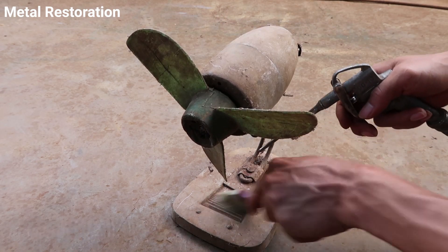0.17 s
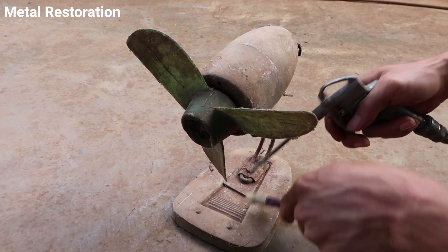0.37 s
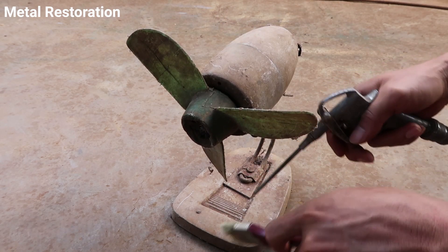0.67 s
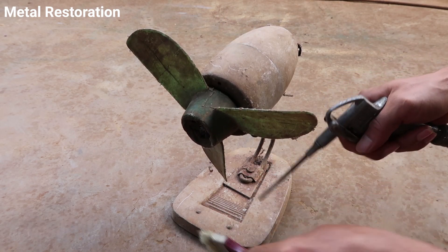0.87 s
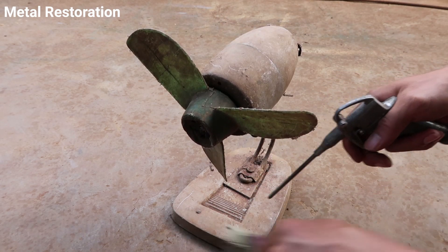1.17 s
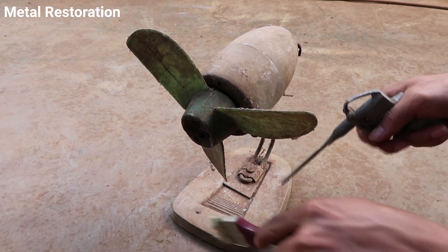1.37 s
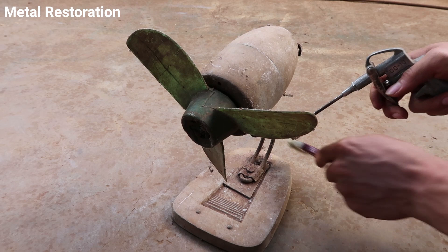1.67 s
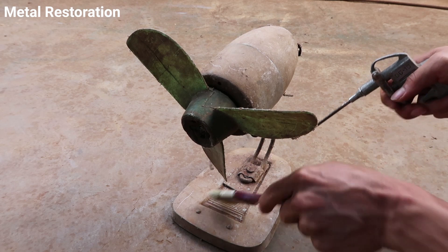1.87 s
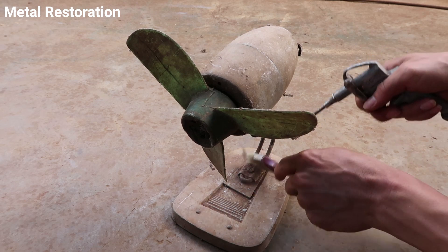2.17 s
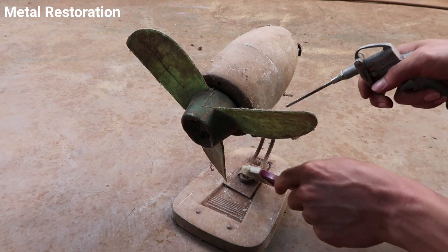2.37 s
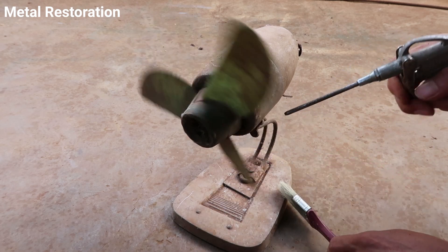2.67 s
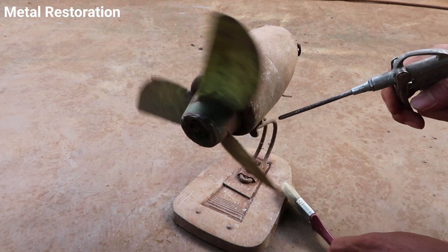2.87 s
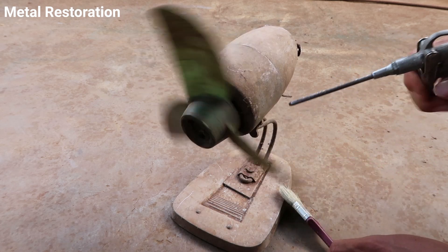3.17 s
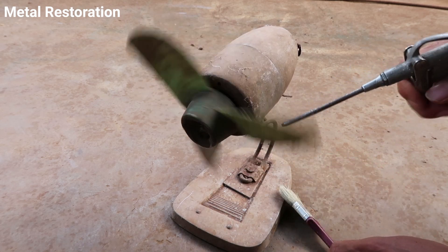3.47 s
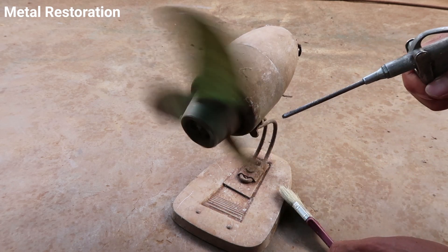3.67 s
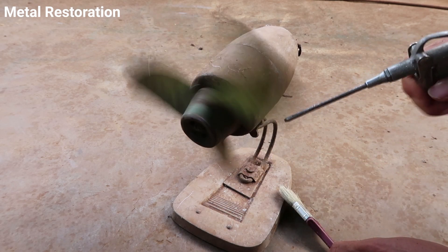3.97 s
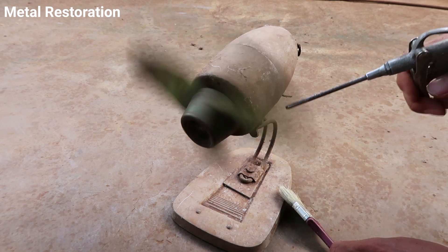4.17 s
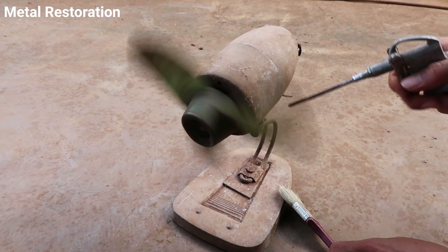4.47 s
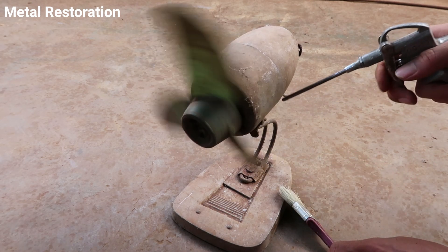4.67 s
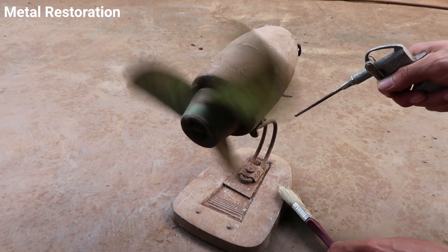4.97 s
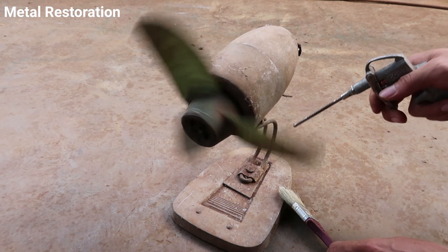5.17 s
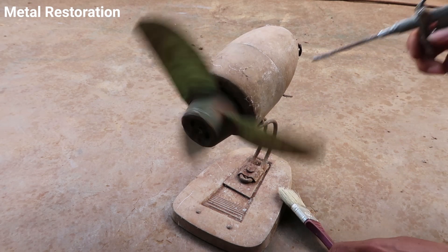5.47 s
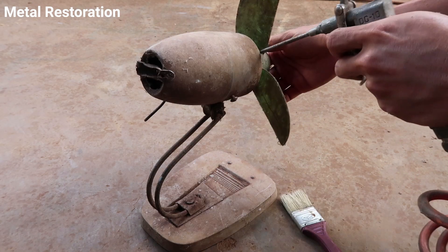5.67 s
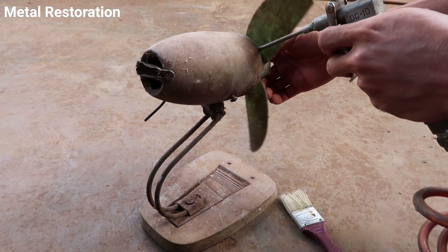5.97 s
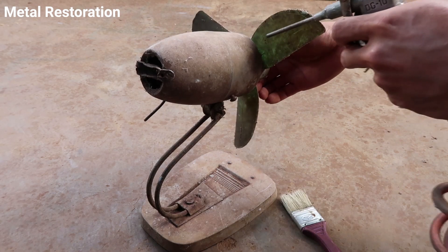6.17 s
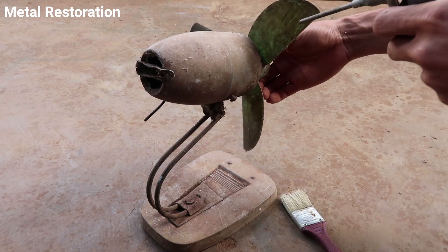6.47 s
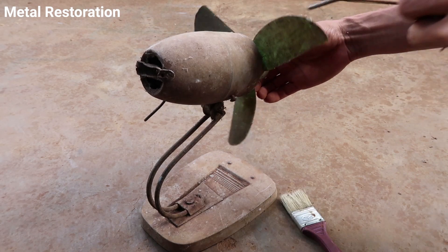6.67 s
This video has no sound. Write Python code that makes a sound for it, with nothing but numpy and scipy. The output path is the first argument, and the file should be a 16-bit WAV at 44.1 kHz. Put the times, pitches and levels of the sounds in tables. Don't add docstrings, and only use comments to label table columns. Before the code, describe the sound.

Close up in a workshop, a brush scrapes briefly and strikes a metal fan's base once, hard. Fifteen separate puffs of compressed air follow, roughly two per second, loud and hissy with a hollow, airy ring that shifts as the jet moves over base, motor shell and blades. The final blast is longer. Quiet far engine drone and rumble fill the gaps; the last three bursts follow an abrupt scene change.

```python
import sys
import numpy as np
from scipy import signal
from scipy.fft import rfft, irfft, next_fast_len
from scipy.io import wavfile
from scipy.ndimage import uniform_filter1d

SR = 44100
rng = np.random.default_rng(int(sys.argv[2]) if len(sys.argv) > 2 else 0)


def ratio_of_db(decibels):
    return 10 ** (np.asarray(decibels, float) / 20)


def wav_record(signal):
    frames = np.transpose(np.atleast_2d(signal))
    bounded = np.clip(frames, -1, 1)
    quanta = np.round(bounded * 32767).astype(np.int16)
    wavfile.write(sys.argv[1], SR, quanta)


N = 300762
T = np.arange(N) / SR
BIN_HZ = np.fft.rfftfreq(512, 1 / SR)
FRAME_S = np.arange(N // 128 + 6) * 128 / SR
SCENE_CHANGE_S = 5.677
CHANGED = T > SCENE_CHANGE_S

# pitch in Hz, correlation from 0 to 1.
PORT_LIKENESS = [(60, 1), (200, .994), (380, .96), (950, .993), (2400, .935), (6000, .865), (9000, .77),
                 (15000, .64)]
# pitch in Hz, left minus right in dB.
PORT_LEAN = [(60, 0), (200, -.3), (380, -.5), (700, -4), (1200, -4), (2380, -2), (5980, -0.6),
             (15000, -0.1)]
# pitch in Hz, left lead in radians.
PORT_LEAD = [(0, 0), (80, -0.1), (160, -.4), (400, -0.16), (2500, 0.02), (6000, -0.28), (9000, -1.04),
             (12500, -1.2), (16000, -0.9)]
# pitch in Hz, t60 in seconds, level in dB.
ROOM_DECAY = [(200, 0.63, -2.5), (700, 0.4, 2.5), (1400, 0.37, 3), (2500, 0.37, 4.5), (4600, 0.41, -1.5),
              (9970, 0.34, 0.5), (16000, 0.36, -1.5)]

# pitch in Hz, density in dB per Hz.
WASH_SPECTRUM = [(30, -30.5), (200, -10.5), (260, -18.5), (500, -13), (800, -20.5), (2500, -17.5),
                 (6000, -29), (10000, -37), (15000, -60)]
# time in seconds, level in dB.
RUMBLE_LEVEL = [(0, -47), (1.04, -53), (1.29, -73), (1.45, -61), (1.7, -53), (1.98, -51), (2.49, -56),
                (3.21, -49.5), (3.75, -69), (4.08, -53), (5.6, -56), (5.72, -56.5), (6.55, -66),
                (6.82, -51)]
# pitch in Hz, width in Hz, level in dB.
RUMBLE_MODES = [(60, 56, -2.5), (87, 73, 13), (183, 40, 5)]
# time in seconds, firing rate in Hz, level in dB.
ENGINE_COURSE = [(0, 28.73, -53.5), (1.1, 29.1, -56.5), (1.45, 29.35, -47.5), (2, 29.24, -51.5),
                 (2.5, 30.13, -57.5), (3.599, 28.34, -51), (4, 28.04, -65), (4.5, 27.6, -49),
                 (5.6, 26.87, -56), (5.7, 26.8, -86)]
# multiple of the firing rate, level in dB.
ENGINE_ORDERS = [(2, -8), (3, -2), (4, -12), (5, 0), (6, -9), (7, -10)]
# time in seconds, change in dB.
THIRD_ORDER_THROB = [(0, -3.5), (1.1, -8), (1.55, -9.5), (1.8, 5), (2.4, 0.5), (3.2, 3.5), (4, 7),
                     (4.6, 2.5), (5.6, 3.5)]
# time in seconds, pitch in Hz, level in dB.
MOTOR_COURSE = [(0, 176, -55), (0.451, 166, -48.5), (.8, 180, -57.5), (1.101, 180, -70), (1.6, 182, -65),
                (1.75, 180, -54), (2.0, 176, -55), (2.3, 163, -78), (2.9, 165, -58), (3.1, 182, -58),
                (3.4, 186, -63), (4.2, 150, -83), (4.5, 165, -62.5), (4.9, 185, -63.5), (5.3, 170, -75.5),
                (5.85, 153, -68.5), (6.4, 173, -58.5), (6.75, 184, -72)]

# start in seconds, length in seconds, level in dB.
BRUSH_STROKES = [
    (-.02, 0.14, -43),
    (0.093, 0.18, -49),
    (0.233, 0.036, -43.5),
    (0.267, 0.085, -39.5),
    (0.307, 0.39, -51),
    (1.186, 0.2, -57),
    (1.412, 0.14, -57),
    (1.783, .1, -61),
    (1.877, 0.12, -50.5),
]
# pitch in Hz, density in dB per Hz.
BRISTLE_SPECTRUM = [(180, -43), (300, -3), (801, -5), (898, -6), (2070, -7.5), (2400, -7), (2920, -8.5),
                    (4690, -16), (10000, -23), (15000, -37.5)]
# time in seconds, peak in dB, tick in dB, damping factor,
# brightness in dB per octave.
KNOCK_EVENTS = [(.03, -45.5, -46, 0.71, -0.5), (.07, -44, -46, 1, -1.5), (.242, -33.5, -42, 2.7, 3),
                (.275, -48.5, -57, 1.1, -1.5), (0.303, -7.5, -22.5, 1.51, -2),
                (.397, -40.5, -60, 0.9, -0.5), (.428, -34, -54, 1.1, -2), (1.24, -50.5, -60, 0.38, -7),
                (2.925, -61, -23, 2.6, 5), (3.948, -66, -75, 1, -1), (5.4797, -60, -5.5, 2.6, 5)]
# pitch in Hz, level in dB, t60 in seconds.
KNOCK_MODES = [(425, -26.5, .5), (744, -25, .45), (796, -6.5, .18), (1010, -14, .06), (758, -13, .2),
               (1141, -24, .22), (782, -2, .045), (1389, -24, .28), (1442, -17, .22), (1770, -16, .07),
               (1810, -20, .25), (2130, -18, .17), (2860, -17, .07), (3420, -19, .06)]

# valve opens in seconds, valve shuts in seconds, jet level in dB,
# pressure sag in dB, opening thump in dB.
BURSTS = [(0.5213, 0.671, -21.5, 2, -21), (.876, 1.028, -17.5, -4.5, -28.5),
          (1.4869, 1.64, -23.5, 1.5, -30), (1.97, 2.104, -20.5, -1.5, -34.5),
          (2.261, 2.403, -21.5, -5, -35.5), (2.6218, 2.788, -21.5, -5.5, -36), (3.095, 3.296, -20, -3, -34),
          (3.586, 3.866, -22, -4, -35.5), (4.086, 4.288, -20.5, -8, -49), (4.583, 4.758, -21, -4, -38.5),
          (4.998, 5.167, -23.5, 0, -32.5), (5.344, 5.495, -18.5, -6.5, -36),
          (5.788, 5.952, -21.5, -5, -40.5), (6.111, 6.26, -24, -3.5, -48), (6.477, 6.829, -23, 2, -47)]
# base resonance in dB, shell resonance in dB, blade resonance in dB,
# edge pitch at opening in Hz, edge pitch at shutting in Hz.
BURST_AIM = [(-10.5, -16.5, -15.5, 6070, 5240), (-10, -13, -3.5, 4460, 3300), (-19, -11.5, -19, 5940, 6000),
             (-13, -3.5, -7.5, 4100, 4300), (-13.5, -11, -12, 6300, 3750), (-14, -7.5, -11.5, 5960, 3400),
             (-8.5, 1.5, -6.5, 4800, 5600), (-14, -1, -1, 5600, 5640), (-12, 1.5, -9.5, 5100, 6050),
             (-40, -18, -4, 5840, 6200), (-11.5, -14, -12.5, 6940, 6250), (-12, -8.5, -26, 3800, 6160),
             (-2, 7, 3.5, 3100, 5550), (-7.5, 0, 2, 3300, 6600), (-3.5, 1.5, -2, 4930, 3800)]
# time in seconds, half length in seconds,
# jet change in dB, base change in dB, shell change in dB.
CROSSINGS = [(0.58, 0.029, 0, 5.5, 7.5), (0.67, 0.0071, -4, 3, 18), (1.01, .03, 0.5, 9, 10.5),
             (1.516, 0.022, -0.5, 11.5, -9.5), (1.556, 0.03, -1, -9, -16), (1.614, 0.028, -1, 13.5, 7.5),
             (1.976, 0.024, 2.5, 11, 1.5), (2.096, 0.015, -2, 5, 3), (2.382, 0.036, -1, 12.5, 12),
             (3.132, 0.017, -1.5, 6.5, 1.5), (3.276, 0.053, -0.5, 7.5, 1.5), (3.667, 0.015, 0, 12, 5.5),
             (3.733, 0.011, -3.5, -11, 4), (3.852, 0.049, 2.5, 12.5, 9), (4.25, 0.051, 1.5, 11, 1.5),
             (5.09, 0.036, -1.5, 12, 13.5), (5.458, 0.019, -8, 18, 10), (5.478, 0.012, 1, 8.5, -10.5),
             (6.175, 0.051, 1.5, 7.5, 8.5), (6.573, 0.037, -2, 1.5, 2), (6.714, 0.027, -0.5, 1.5, 4.5),
             (6.79, 0.031, -2, 0, -6.5)]
# time in seconds, half length in seconds,
# jet change in dB, blade change in dB, brightness change in dB.
SLIPS = [(.654, 0.036, 0, 5, 0.5), (.9, 0.0069, 0.5, 4, -2.5), (.99, 0.025, -2, 8, 3.5),
         (1.563, 0.015, 0, 14, 4), (2.348, .03, 2.5, 3, -4.5), (2.63, 0.01, 4, 5.5, 0.5),
         (3.185, .025, -0.5, 11.5, 0), (3.28, 0.028, 0.5, -18, 1.5), (3.625, 0.018, 3.5, -16, 1),
         (3.697, 0.011, 5, -10, -7), (3.78, 0.016, 4, -25, -2.5), (4.176, 0.042, -2.5, 13.5, 0.5),
         (4.586, 0.022, -3, 3.5, 0.5), (4.75, 0.021, -5, -8, 0), (5.042, 0.032, -2, 2, 4),
         (5.126, 0.017, 2, 5, -0.5), (5.42, .03, 0.5, -2, -3), (5.81, 0.018, 1, -1, 4),
         (6.257, 0.026, 3.5, -6, -2.5), (6.576, 0.071, -0.5, -10, 4), (6.72, 0.027, -1.5, 6, 4.5),
         (6.795, 0.023, 1, -14, 6), (6.825, .018, -9, -0.5, -3.5)]
# time in seconds, half length in seconds, pitch in Hz, lift in dB.
RIMS = [(0.51, .05, 1800, 3.5), (0.88, .09, 1200, 4), (2.041, 0.069, 5800, 5.5), (2.095, 0.03, 4250, 8),
        (3.861, .025, 3660, 11.5), (4.68, 0.086, 1800, 7), (5.4, 0.078, 4400, 5.5), (5.2, .06, 3300, 10.5),
        (6.22, .05, 5500, 0.5), (6.582, 0.061, 2300, 2.5), (6.79, .015, 7400, 7), (.96, 0.053, 2350, 0.5),
        (0.75, .04, 1700, 9), (3.73, .04, 2900, -1), (3.645, .03, 1800, -2.5), (0.53, .1, 12000, -3.5),
        (.56, 0.06, 3000, -2.5), (1.5, 0.031, 7300, 7), (1.565, 0.056, 3000, -3), (2.278, 0.047, 5500, 4.5),
        (2.3, .05, 2900, 1.5), (2.64, .03, 3200, 3), (4.1, .03, 2400, 1), (4.63, 0.036, 4500, 1),
        (4.644, .04, 2900, 8.5), (4.68, .05, 4100, 4), (4.71, .05, 3000, 3.5), (4.66, .06, 3200, -6.5),
        (5.36, .025, 3100, 1), (5.37, .03, 7000, 1), (5.026, .04, 7200, 0.5), (1.4, .06, 3600, 8),
        (2.3, .06, 960, 9), (5.14, .04, 6600, 0), (5.05, 0.049, 1700, -10), (5.369, .03, 1150, 4.5),
        (5.41, 0.03, 1250, 6.5), (4.3, .02, 890, 7), (5.1, .018, 660, 11), (5.8, .025, 1520, 5.5),
        (0.82, .03, 1550, 8), (5.1, .04, 1150, 4.5), (5.478, 0.0072, 7100, 6), (6.14, 0.072, 3530, 8.5),
        (6.19, 0.075, 6800, 5.5), (6.12, 0.034, 5300, 5.5), (6.59, 0.11, 8500, 2.5),
        (5.84, 0.061, 8300, 0.5)]
# pitch in Hz, density in dB per Hz.
JET_SPECTRUM = [(40, -45.5), (100, -14.5), (218, -17), (556, -8.5), (870, -11), (1700, -5.5), (3080, -1),
                (5540, -2.5), (9060, -2), (12500, -10), (14800, -17), (15400, -12), (16000, -29)]
# pitch in Hz, width in Hz, level in dB.
BASE_MODES = [(762, 230, 6.5), (886, 270, 4.5), (596, 630, 0)]
# pitch in Hz, width in Hz, level in dB.
SHELL_MODES = [(1328, 223, 2), (1415, 213, -0.5), (1576, 410, -8)]
# pitch in Hz, width in Hz, level in dB.
BLADE_MODES = [(2375, 400, 3), (2840, 380, -1), (3530, 910, 1.5)]
# pitch in Hz, width in Hz, level in dB.
BLADE_BACK_MODES = [(2450, 130, -6.5), (2970, 920, 4.5), (3480, 700, 1.5)]
# pitch in Hz, width in Hz, level in dB.
PLATE_MODES = [(762, 20, 0), (795, 24, -3)]


def evened(x):
    return x / np.sqrt(np.mean(x ** 2) + 1e-20)


def read(points, hz):
    point_hz, value = np.transpose(points)
    return np.interp(np.log(hz + 1), np.log(point_hz + 1), value)


def curve(points, column=1):
    columns = np.transpose(points)
    return np.interp(T, columns[0], columns[column])


def noise(field_db):
    a, b, c, d = rng.standard_normal((len(FRAME_S), len(BIN_HZ), 4)).T
    same = np.clip(read(PORT_LIKENESS, BIN_HZ), -1, 1)[:, None]
    left = a + 1j * b
    right = same * left + np.sqrt(1 - same ** 2) * (c + 1j * d)
    right = right * np.exp(-1j * read(PORT_LEAD, BIN_HZ))[:, None]
    lean = ratio_of_db(read(PORT_LEAN, BIN_HZ) / 2)[:, None]
    z = np.array([left * lean, right / lean]) * ratio_of_db(field_db)
    return signal.istft(z, nperseg=512, noverlap=384)[1][:, :N]


def patches(bins, frames):
    field = rng.standard_normal((len(FRAME_S), len(BIN_HZ))).T
    return evened(uniform_filter1d(uniform_filter1d(field, bins, 0), frames, 1))


def resonate(x, modes):
    out = 0
    for hz, width_hz, db in modes:
        b, a = signal.iirpeak(hz, hz / width_hz, SR)
        out = out + ratio_of_db(db) * evened(signal.lfilter(b, a, signal.lfilter(b, a, x)))
    return evened(out)


def slow_drift():
    return evened(uniform_filter1d(uniform_filter1d(rng.standard_normal(N), size=5000), size=5000))


def unsteady_turns(rate_hz):
    return np.cumsum(rate_hz * (1 + 0.0067 * slow_drift())) / SR


def engines():
    turns = unsteady_turns(curve(ENGINE_COURSE))
    orders = 0
    for k, db in ENGINE_ORDERS:
        order_db = db + (k == 3) * curve(THIRD_ORDER_THROB) + 2.5 * slow_drift()
        orders = orders + ratio_of_db(order_db) * np.sin(2 * np.pi * (k * turns + rng.random()))
    engine = ratio_of_db(curve(ENGINE_COURSE, 2)) * evened(orders)
    motor_turns = unsteady_turns(curve(MOTOR_COURSE))
    motor_db = curve(MOTOR_COURSE, 2) + 6 + 2.5 * slow_drift()
    return engine + ratio_of_db(motor_db) * np.sin(2 * np.pi * motor_turns)


def background():
    rumble = resonate(rng.standard_normal(N), RUMBLE_MODES) * ratio_of_db(curve(RUMBLE_LEVEL) - 2.0)
    wash = evened(noise(read(WASH_SPECTRUM, BIN_HZ)[:, None] + 2.7 * patches(bins=5, frames=20)))
    wash_db = -58.5 - 5.3 * CHANGED
    return rumble + engines() + ratio_of_db(wash_db) * wash


def tail():
    taps = np.zeros((2, SR // 2))
    at = np.arange(260, SR // 2 - 16, 16)
    at = at + rng.integers(0, 16, (2, len(at)))
    np.put_along_axis(taps, at, rng.choice([-1., 1.], at.shape), 1)
    hz, t, z = signal.stft(taps, SR, nperseg=256)
    same = np.clip(read(PORT_LIKENESS, hz) - .1 * np.clip(hz / 300, 0, 1), 0, 1)[:, None]
    z[1] = same * z[0] + np.sqrt(1 - same ** 2) * z[1]
    z[1] *= np.exp(-1j * read(PORT_LEAD, hz))[:, None]
    decay = np.array(ROOM_DECAY)
    t60_s = read(decay[:, [0, 1]], hz)[:, None]
    colour_db = read(decay[:, [0, 2]], hz)[:, None]
    out = signal.istft(z * ratio_of_db(colour_db - 60 * t / t60_s), SR, nperseg=256)[1]
    return out / np.linalg.norm(out[0])


def room(x, paths=9):
    cut, size = round(SCENE_CHANGE_S * SR), next_fast_len(N + 2 * SR)
    spaced = np.insert(x, cut, np.zeros(SR))
    turn = np.arange(len(spaced)) * 50 / SR
    wet = 0
    for k in range(paths):
        share = np.cos(np.pi / 2 * np.clip((turn - k + 1) % paths - 1, -1, 1))
        wet = wet + rfft(spaced * share, size) * rfft(tail(), size)
    out = np.delete(irfft(wet, size), np.s_[cut:cut + SR], axis=1)[:, :N]
    return out * np.clip(abs(SCENE_CHANGE_S - T) / 0.006, 0, 1)


def brush():
    level = 0
    for start_s, length_s, db in BRUSH_STROKES:
        level = level + ratio_of_db(db) * np.sin(np.pi * np.clip((T - start_s) / length_s, 0, 1)) ** .7
    scratch_db = 3 * patches(bins=5, frames=9) + 1.0 * patches(bins=150, frames=3)
    return level * evened(noise(read(BRISTLE_SPECTRUM, BIN_HZ)[:, None] + scratch_db))


def knocks():
    out, t = np.zeros(N), np.arange(12000) / SR
    spreads_db = rng.uniform(0.021, 3.2, (len(KNOCK_EVENTS), len(KNOCK_MODES)))
    for (s, db, tick_db, damping, tilt_db_oct), spread_db in zip(KNOCK_EVENTS, spreads_db):
        ring = 0
        for k, (hz, mode_db, t60_s) in enumerate(KNOCK_MODES):
            fall_db = mode_db + spread_db[k] + tilt_db_oct * np.log2(hz / 800) - 60 * t * damping / t60_s
            ring = ring + (-1) ** k * ratio_of_db(fall_db) * np.sin(2 * np.pi * hz * t)
        tick = resonate(rng.standard_normal(len(t)), [(6170, 3000, 0)]) * np.exp(-t / 0.00068)
        crack = resonate(rng.standard_normal(len(t)), [(1200, 650, 0)]) * np.exp(-t / 0.0051)
        body = 1.43 * ratio_of_db(db) * (ring + 0.48 * crack) * (1 - np.exp(-t / 0.0021))
        part = out[round(s * SR):][:len(t)]
        part += (body + ratio_of_db(tick_db) * tick)[:len(part)]
    return out * ratio_of_db(np.array([[-1.8], [1.8]]))


def valve():
    width_s, swing_hz, swing_s, lead_s = 0.00087, 110, 0.014, .0112
    out, t = np.zeros(N), np.arange(-400, 2600) / SR
    dip = -np.exp(-.5 * (t / width_s) ** 2)
    swing = 0.041 * np.sin(2 * np.pi * swing_hz * t) * np.exp(-abs(t) / swing_s) * (t > 0)
    for open_s, *_, thump_db in BURSTS:
        out[round((open_s - lead_s) * SR)] = ratio_of_db(thump_db + 11.0)
    b, a = signal.butter(1, 110, "high", fs=SR)
    return signal.lfilter(b, a, signal.oaconvolve(out, dip + swing)[:N])


def passing(rows):
    coarse = sum(np.outer(row[2:], np.exp(-((FRAME_S - row[0]) / row[1]) ** 2)) for row in rows)
    return np.array([np.interp(T, FRAME_S, column) for column in coarse])


def trigger():
    open_db_s, shut_db_s = 5001.5, 1302.5
    full_hose_db = -30.5
    surge_share, surge_s, soft_share, soft_s = 0.95, 0.013, 0.16, 0.018
    build_db, build_s = 0.5, 0.032
    open_s, shut_s, level_db, sag_db, thump_db = np.transpose(BURSTS)
    which = np.clip(np.searchsorted(open_s - .03, T) - 1, 0, None)
    since_s = T - open_s[which]
    held = np.clip(since_s / (shut_s - open_s)[which], 0, 1)
    excess_db = (thump_db - full_hose_db)[which]
    surge_db = surge_share * np.maximum(excess_db, 0) * np.exp(-abs(since_s) / surge_s)
    soft_db = soft_share * np.minimum(excess_db, 0) * np.exp(-abs(since_s) / soft_s)
    gate_db = open_db_s * np.minimum(since_s, 0) - shut_db_s * np.maximum(T - shut_s[which], 0)
    jet_db = level_db[which] + sag_db[which] * held + surge_db + soft_db + np.maximum(gate_db, -120)
    base_db, shell_db, blade_db, from_hz, to_hz = np.transpose(BURST_AIM)[:, which]
    speak_db = build_db * np.exp(-abs(since_s) / build_s)
    cross_jet_db, cross_base_db, cross_shell_db = passing(CROSSINGS)
    slip_db, touch_db, bright_db = passing(SLIPS)
    jet_db = jet_db + cross_jet_db + slip_db
    base_db = base_db + speak_db + cross_base_db
    shell_db = shell_db + speak_db + cross_shell_db
    edge_hz = from_hz + (to_hz - from_hz) * held
    return jet_db, base_db, shell_db, blade_db + touch_db, edge_hz, bright_db


def hiss_field(edge_hz, bright_db):
    edge_hz = np.interp(FRAME_S, T, edge_hz)
    near_oct = np.log2(edge_hz / 5570)
    upper = np.clip((BIN_HZ[:, None] - 6500) / 4000, 0, 1)
    lift_db = 3 + 8 * near_oct + np.interp(FRAME_S, T, bright_db)
    field_db = read(JET_SPECTRUM, BIN_HZ)[:, None] + upper * lift_db
    from_edge_oct = np.log2((BIN_HZ[:, None] + 1) / edge_hz)
    field_db = field_db + (3.5 + 10 * near_oct) * np.exp(-.5 * (from_edge_oct / .28) ** 2)
    for s, half_s, hz, db in RIMS:
        bump_db = db * np.exp(-(np.log2((BIN_HZ + 1) / hz) / 0.25) ** 2)
        field_db = field_db + np.outer(bump_db, np.exp(-((FRAME_S - s) / half_s) ** 2))
    field_db = field_db + 1.4 * patches(bins=7, frames=16)
    field_db = field_db + 1.1 * patches(bins=120, frames=3)
    return field_db + 1.1 * patches(bins=4, frames=40)


def jet():
    jet_db, base_db, shell_db, blade_db, edge_hz, bright_db = trigger()
    hiss = ratio_of_db(5.0) * evened(noise(hiss_field(edge_hz, bright_db)))
    eddies = noise(1.5 * patches(bins=9, frames=5))
    hollow = ratio_of_db(base_db - 3) * resonate(eddies, BASE_MODES)
    hollow = hollow + ratio_of_db(shell_db - 3) * resonate(eddies, SHELL_MODES)
    hollow = hollow + ratio_of_db(blade_db - 99 * CHANGED - 1) * resonate(eddies, BLADE_MODES)
    hollow = hollow + ratio_of_db(blade_db - 99 * ~CHANGED - 1) * resonate(eddies, BLADE_BACK_MODES)
    plate = resonate(eddies * ratio_of_db(jet_db + base_db + shell_db / 2), PLATE_MODES)
    plate_db = -50 - 3.1 * CHANGED
    return hiss * ratio_of_db(jet_db), hollow * ratio_of_db(jet_db) + ratio_of_db(plate_db) * plate


def scene():
    hiss, hollow = jet()
    hits = knocks()
    hiss = hiss + brush()
    sent = hiss + ratio_of_db(-3.5) * hollow + 0.38 * hits
    return hiss + hollow + hits + ratio_of_db(-9.5) * room(sent.mean(0)) + valve() + background()


def low_pass(x):
    return signal.sosfilt(signal.butter(12, 16430, fs=SR, output="sos"), x)


def record(dry):
    ceiling = .78
    soft = dry / (1 + (dry / ceiling) ** 4) ** .25
    lowpass = signal.firwin(255, 15800, window=("kaiser", 9), fs=SR)
    mix = signal.oaconvolve(soft, lowpass[None], "same")
    return low_pass(mix)


dry = scene()
out = record(dry)
wav_record(out)
```